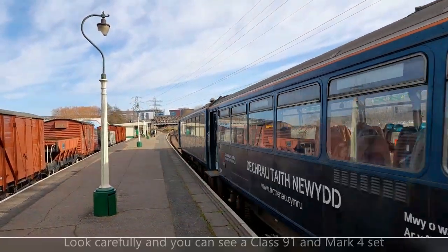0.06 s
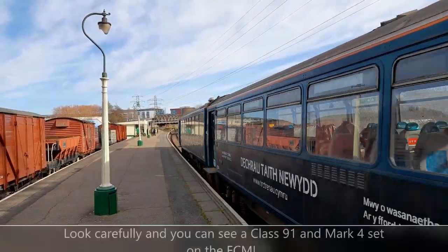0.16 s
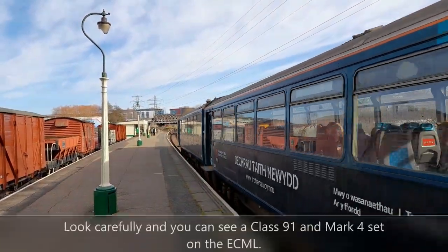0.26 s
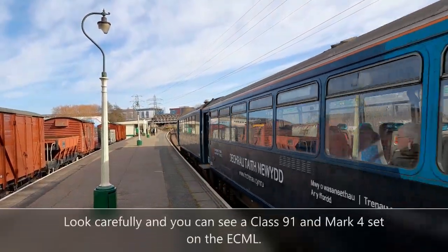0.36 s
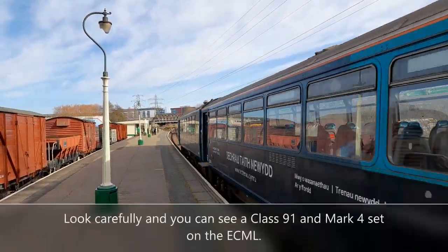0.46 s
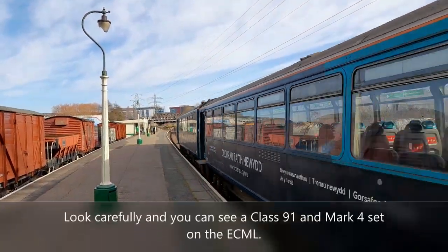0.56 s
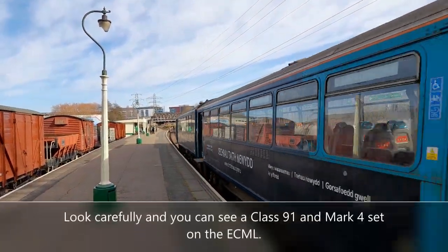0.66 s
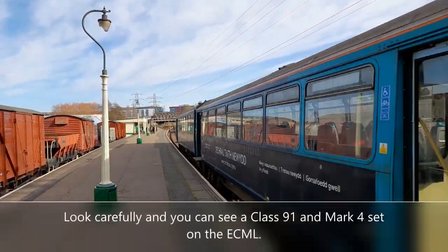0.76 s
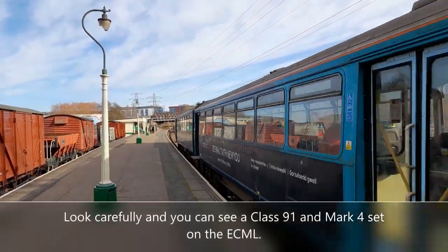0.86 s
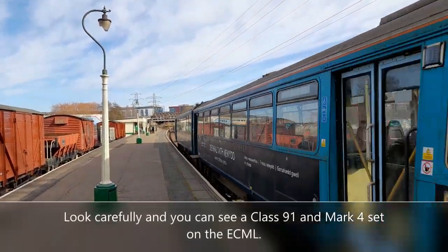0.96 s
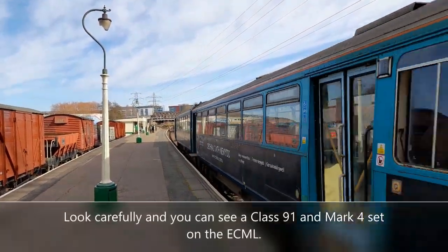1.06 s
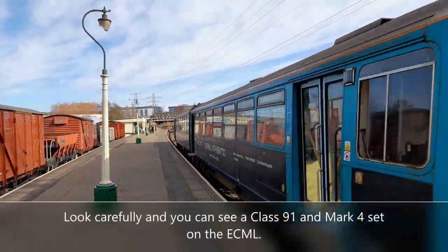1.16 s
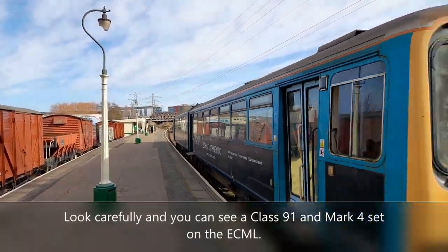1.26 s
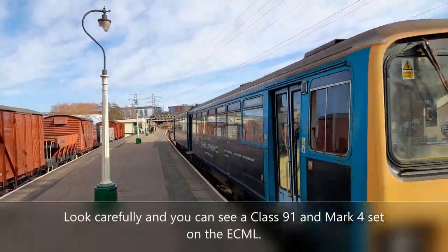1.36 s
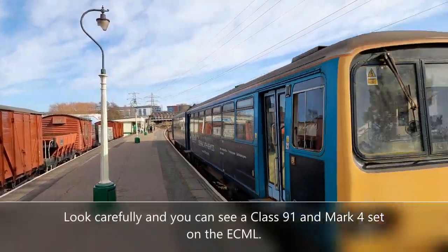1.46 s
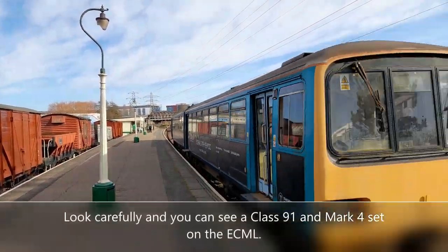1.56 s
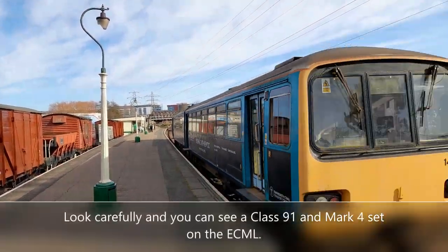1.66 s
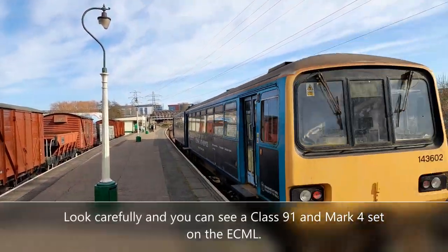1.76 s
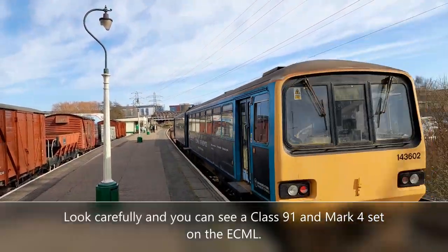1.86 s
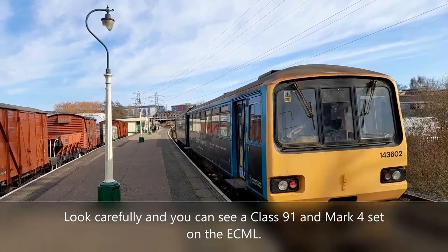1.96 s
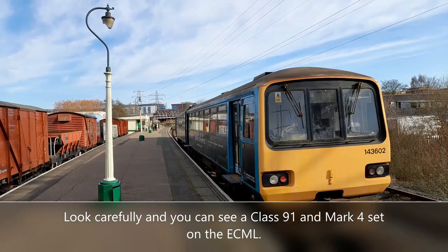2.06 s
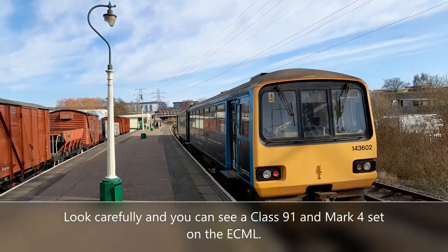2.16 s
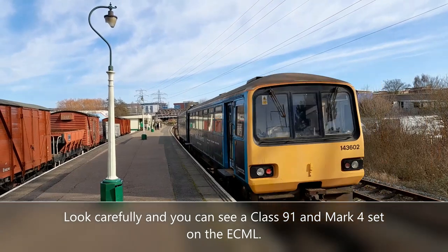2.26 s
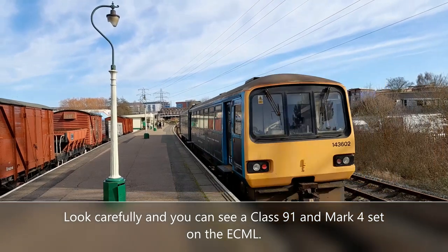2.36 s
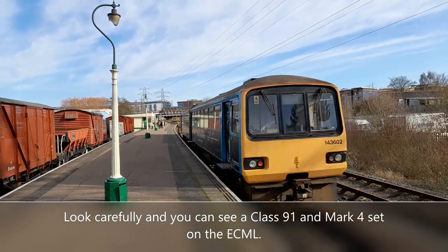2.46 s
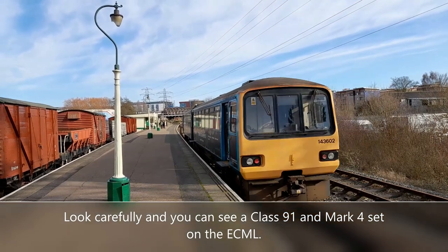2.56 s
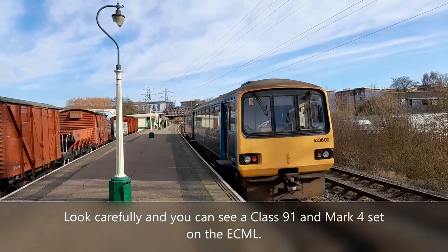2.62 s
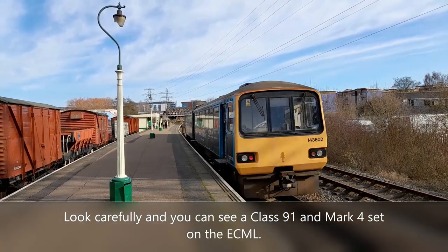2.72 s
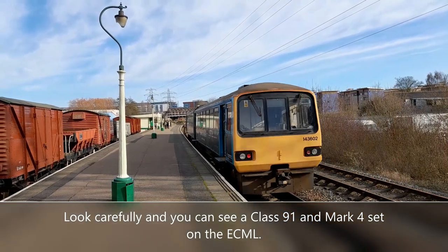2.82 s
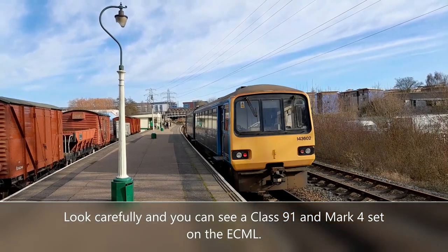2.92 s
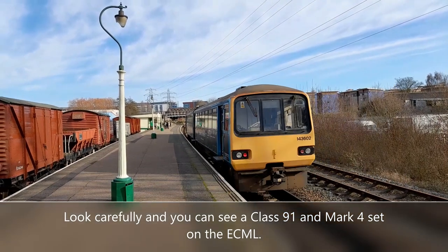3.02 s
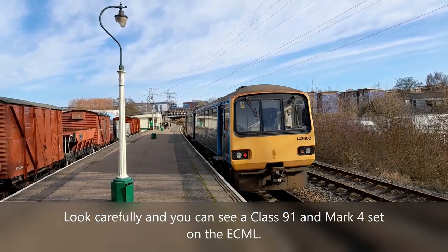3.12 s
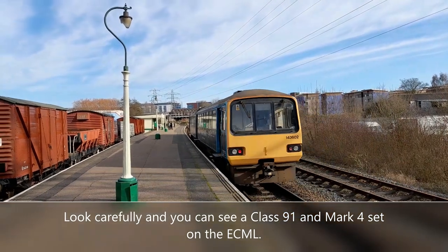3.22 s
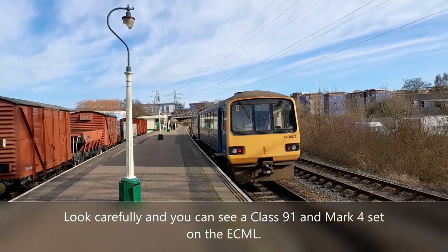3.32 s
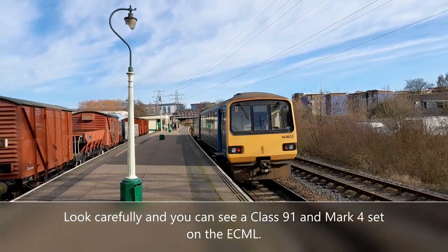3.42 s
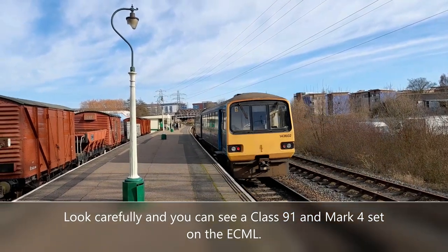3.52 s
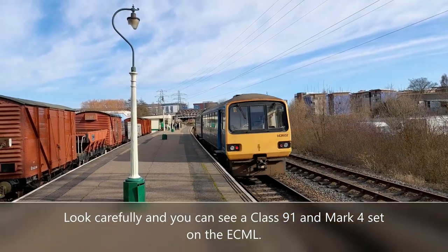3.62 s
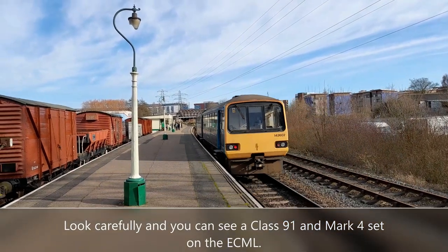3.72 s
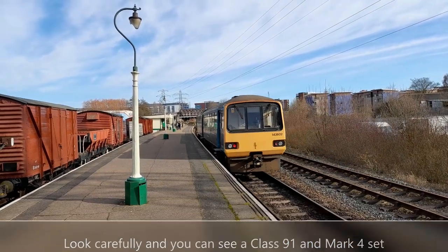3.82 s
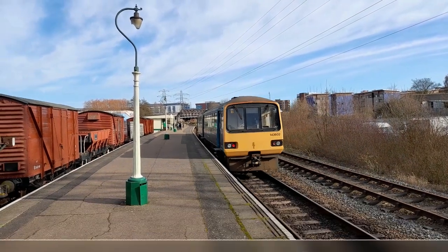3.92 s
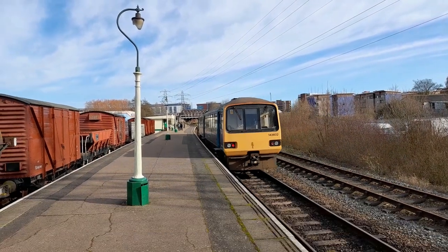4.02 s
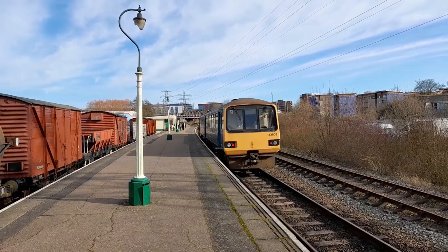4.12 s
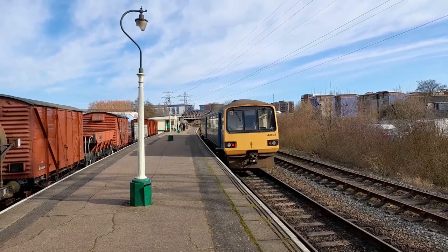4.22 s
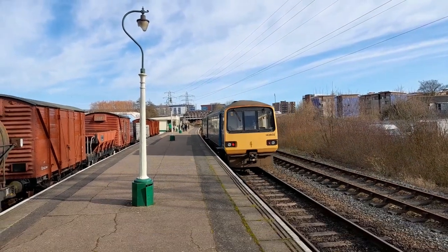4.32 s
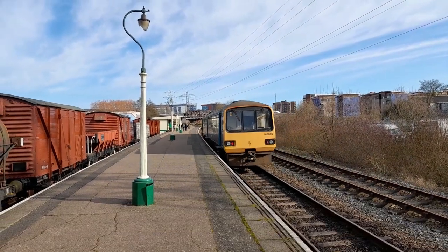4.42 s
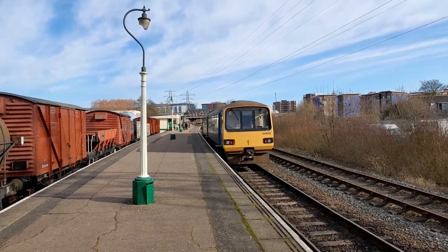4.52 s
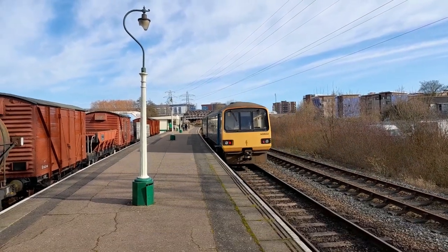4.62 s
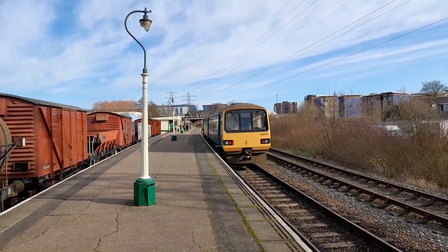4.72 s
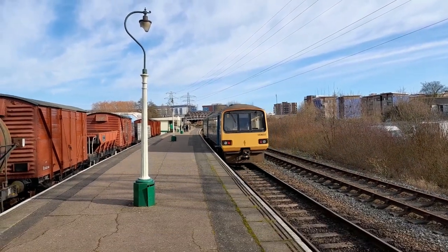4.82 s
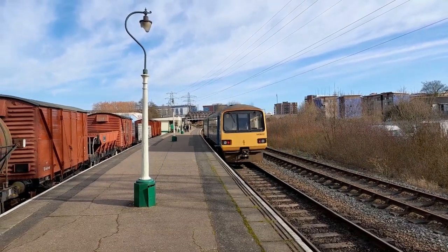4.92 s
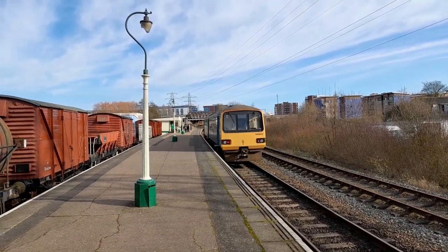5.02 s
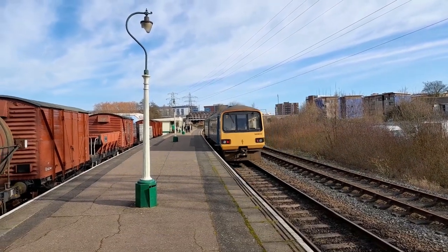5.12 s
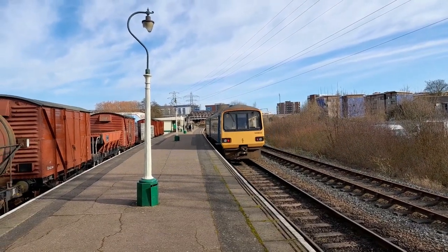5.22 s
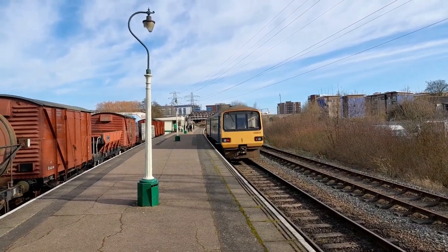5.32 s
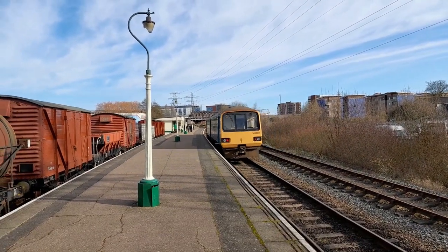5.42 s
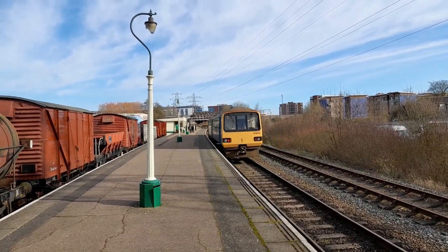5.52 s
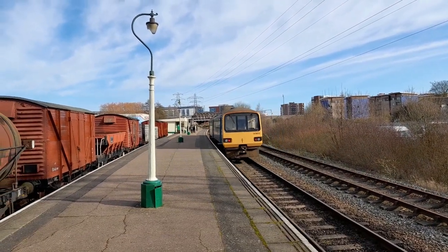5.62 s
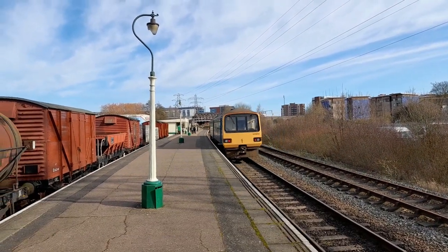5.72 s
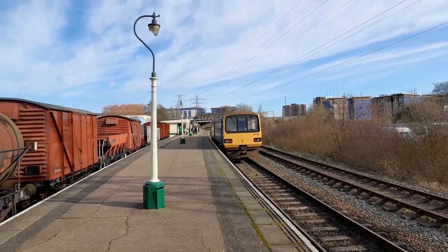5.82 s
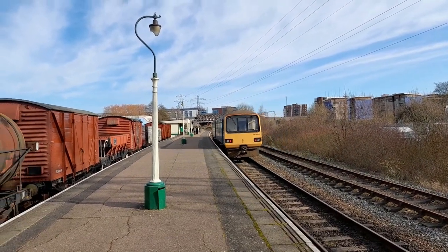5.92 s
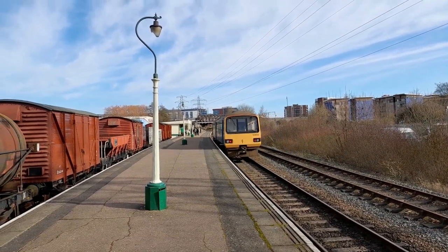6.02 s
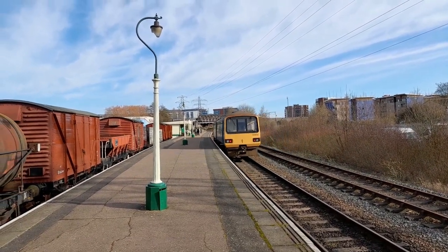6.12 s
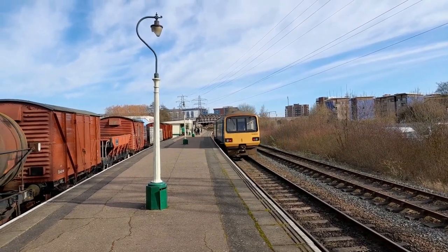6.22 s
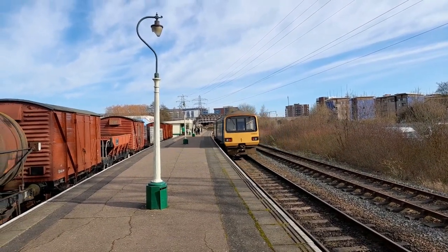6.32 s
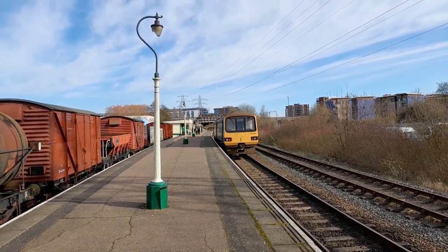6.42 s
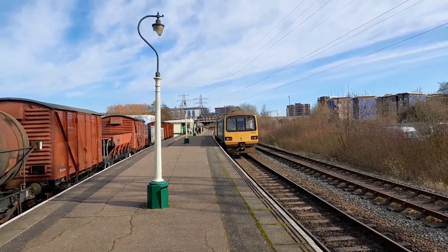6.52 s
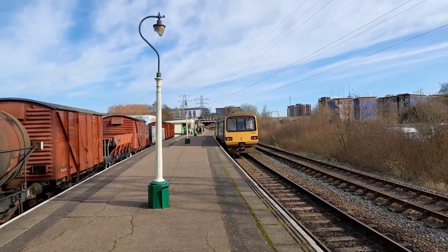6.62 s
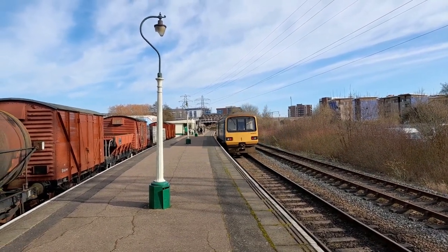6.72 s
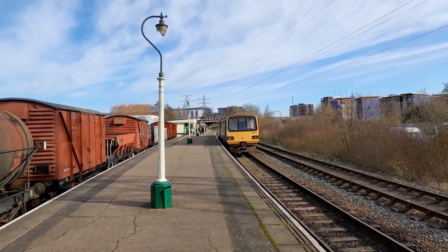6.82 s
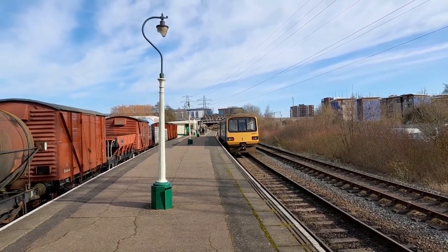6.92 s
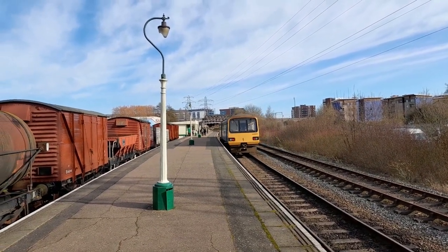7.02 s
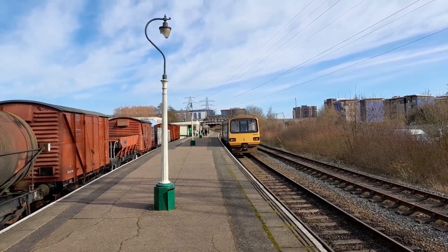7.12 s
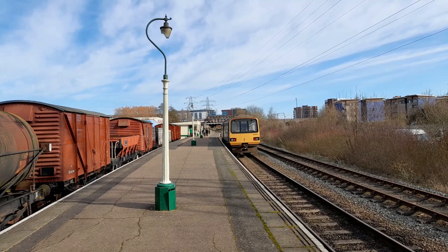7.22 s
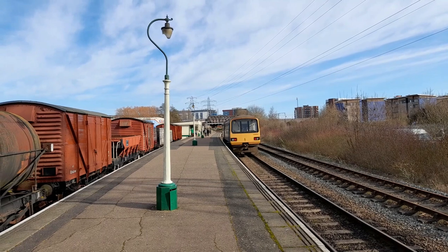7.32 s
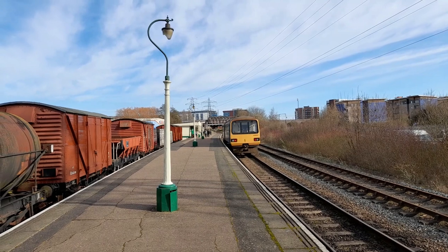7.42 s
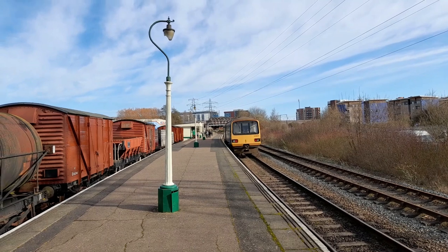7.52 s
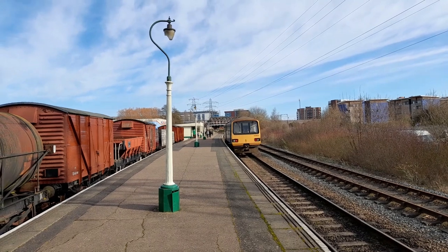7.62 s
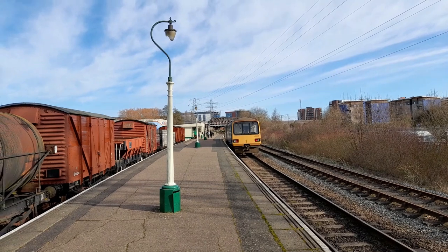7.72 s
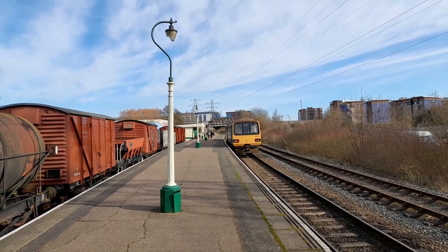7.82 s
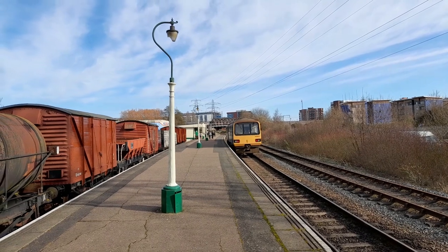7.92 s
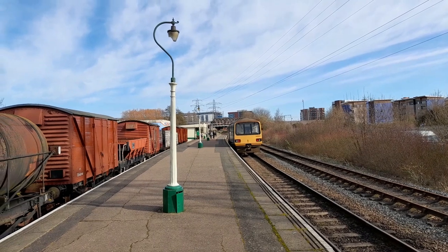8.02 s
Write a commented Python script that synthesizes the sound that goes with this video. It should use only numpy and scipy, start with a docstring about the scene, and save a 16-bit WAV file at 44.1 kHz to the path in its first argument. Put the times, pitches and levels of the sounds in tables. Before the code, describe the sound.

Close train wheels rumble, clank over rail joints and shriek on the curve, then recede into a low diesel drone with fainter late squeals.

```python
"""Diesel railbus leaving a curved platform

A diesel railbus draws slowly away along a curved station platform, close by at first.
Shaped noise rumbles for the rolling wheels; struck modes thud at the rail joints.
Noise-driven resonances grind as the flanges, and two gliding wheel modes take turns to squeal.
Engine orders drone underneath, bursts of contacts clatter, and a faint noise hisses on the left."""
import sys
import numpy as np
from scipy import signal
from scipy.io import wavfile

SR = 44100
rng = np.random.default_rng(int(sys.argv[2]) if len(sys.argv) > 2 else 0)


def generate_wav(sig):
    """Save sig (samples, or channels by samples) to the path in sys.argv[1] as 16-bit PCM at SR."""
    pcm = np.round(np.clip(np.atleast_2d(sig).T, -1, 1) * 32767).astype(np.int16)
    wavfile.write(sys.argv[1], SR, pcm)


N = 355887
TIME = np.arange(N) / SR


def from_db(db):
    """Decibels to gain."""
    return 10 ** (np.asarray(db) / 20)


def rms_one(x):
    """Scale to unit power."""
    return x / np.sqrt(np.mean(x ** 2) + 1e-20)


def at_hz(points, hz):
    """Read a spectrum on a log-frequency axis."""
    corner_hz, values = np.transpose(points)
    return np.interp(np.log(hz), np.log(corner_hz), values)


def pan(left_db):
    """Channel gains with a mean of one; left_db is left over right."""
    gains = from_db([[left_db / 2], [-left_db / 2]])
    return gains / gains.mean()


def drift(rate):
    """Smooth random wander of spread one; a higher rate in Hz wanders faster."""
    r = np.exp(-80 * np.pi * rate / SR)   # computed at every 40th sample
    noise = rng.standard_normal(N // 40 + 2002)
    slow = signal.lfilter([1], [1, -2 * r, r * r], noise)[2000:]   # skip the filter's start
    return np.interp(np.arange(N) / 40, np.arange(len(slow)), rms_one(slow))


def band(x, low, high):
    """Butterworth band-pass."""
    return signal.sosfilt(signal.butter(2, [low, min(high, .45 * SR)], "band", fs=SR, output="sos"), x)


def ring(clicks, hz, t60):
    """A unit click starts a decaying sine of starting height one."""
    r, w = from_db(-60 / (t60 * SR)), 2 * np.pi * hz / SR
    return signal.lfilter([0, np.sin(w)], [1, -2 * r * np.cos(w), r * r], clicks + 1e-18)


def rubbed(force, hz, width):
    """A resonance driven by friction, its far skirts reduced; unit power."""
    r = np.exp(-np.pi * width / SR)
    tone = signal.lfilter([1, 0, -1], [1, -2 * r * np.cos(2 * np.pi * hz / SR), r * r], force)
    return rms_one(band(tone, hz * .88, hz * 1.12))


def stereo(mid, side, alike):
    """Blend two independent noises into a pair whose left-right likeness is alike (-1 to 1)."""
    alike = np.clip(alike, -1, 1)
    return np.sqrt(1 + alike) * mid + np.sqrt(1 - alike) * side * [[1], [-1]]


# How alike the two ears hear the noise. Each row: frequency in Hz, left-right likeness from -1 to 1.
EAR_LIKENESS = [(40, 0.71), (300, 0.74), (650, 0.65), (1200, -0.28), (2200, 0.16), (4000, -0.25),
                (15000, -0.012)]


def banded_noise(spectrum, patchy_db, flicker_rate):
    """Third-octave stereo noise; the bands flicker partly together, partly alone; unit power."""
    out, together = 0, drift(flicker_rate)
    lowest, highest = spectrum[0][0], spectrum[-1][0]
    edges = np.geomspace(lowest, highest, 1 + round(3 * np.log2(highest / lowest)))
    white = rng.standard_normal((2, 2, N))   # neighbouring bands use different noise
    for k, (low, high) in enumerate(zip(edges, edges[1:])):
        mid, side = band(white[k % 2], low, high)
        hz = np.sqrt(low * high)
        flicker_db = patchy_db * (1.07 * together + drift(flicker_rate))
        gain = from_db(at_hz(spectrum, hz) + flicker_db)
        out = out + gain * stereo(mid, side, at_hz(EAR_LIKENESS, hz))
    return rms_one(out)


def platform(x, t60, alike):
    """Dense reflections between train and platform: decaying noise with a soft onset."""
    t = TIME[:SR]
    mid, side = rng.standard_normal((2, SR)) * from_db(-60 * t / t60) * (1 - np.exp(-t / 0.029))
    echoes = stereo(mid, side, alike) / np.sqrt(2 * np.sum(mid ** 2))
    return signal.fftconvolve(np.atleast_2d(x), echoes, axes=1)[:, :N]


def swell_db(s, rise, hold, fade, sag_db=0):
    """Rise, hold and fade; rise and fade are the times for 20 dB, and the hold may sag by some dB a second."""
    age = TIME - s
    outside = np.maximum(-age, 0) / rise + np.maximum(age - hold, 0) / fade
    return -20 * np.minimum(outside, 10) - sag_db * np.clip(age, 0, hold)


# the last wheels pass the listener and roll away at a steady speed
PASS_S, SPEED_M_PER_S, TRACK_DISTANCE_M = 0.024, 5.53, 2.17


def distance():
    """Metres from the listener to the last wheels."""
    return np.hypot(TRACK_DISTANCE_M, SPEED_M_PER_S * (TIME - PASS_S))


def spreading_db():
    """How much weaker a point source has become since it passed."""
    return 20 * np.log10(distance() / TRACK_DISTANCE_M)


# Rough stretches of rail add to the running noise, smooth ones take away.
# Each row: middle in seconds, half length in seconds, then boom, rumble, roar and rush change in dB.
ROUGH_STRETCHES = [(0.312, 0.2, 13.5, 6, 3, 2), (0.76, 0.19, 5, 3, 3.5, 2), (1.446, 0.6, -1.5, -1, 1.5, -1),
                   (2.665, 0.45, 2.5, 7, 4.5, 4), (3.318, 0.36, 4, 2, 6, 1),
                   (3.984, 0.11, -17, -1, -3, -1.5), (4.202, 0.19, 4.5, 2, 8.5, -0.5),
                   (4.85, 0.21, 4.5, 3, 6, -0.5), (5.3, 0.22, -0.5, -1, -1.5, -1),
                   (5.648, 0.087, 1, 1, 7, 1.5), (6.301, 0.19, 5, 0, 2, 0), (7.607, 0.11, -8, 0, 0, -1)]


def rail_roughness_db():
    """What the state of the rail adds to boom, rumble, roar and rush."""
    bumps = [np.exp(-np.minimum(((TIME - s) / half) ** 2, 20)) for s, half, *_ in ROUGH_STRETCHES]
    return np.array(ROUGH_STRETCHES)[:, 2:].T @ np.array(bumps)


# base level at the passing in dB, share of the spreading loss suffered
BOOM_DB, BOOM_FALL = -44, 0.031
RUMBLE_DB, RUMBLE_FALL = -31, 0.57
ROAR_DB, ROAR_FALL = -35, 0.7   # each layer that uses it trims it further
RUSH_DB, RUSH_FALL = -32, 0.88


def running_levels():
    """Boom, rumble, roar and rush in dB: they fall with distance and follow the roughness of the rail."""
    base_db = np.array([[BOOM_DB], [RUMBLE_DB], [ROAR_DB], [RUSH_DB]])
    fall = np.array([[BOOM_FALL], [RUMBLE_FALL], [ROAR_FALL], [RUSH_FALL]])
    return base_db - fall * spreading_db() + rail_roughness_db()


# Colours of the running noise, lowest to highest. Each row: frequency in Hz, relative density in dB per Hz.
BOOM_SPECTRUM = [(22, -27.5), (33, -13), (45, 1.5), (62, 6), (85, -0.5), (110, -0.5)]
RUMBLE_SPECTRUM = [(60, -37), (85, -1.5), (125, 2.5), (190, -1.5), (290, -1.5), (400, -14), (560, -5)]
ROAR_SPECTRUM = [(330, -24.5), (410, -20.5), (510, -9), (660, 12), (800, -9.5), (1050, -13.5), (1400, -44)]
RUSH_SPECTRUM = [(650, -34), (950, 8), (1400, -0.5), (1780, 2.5), (2050, 2), (2700, 0), (3400, -3),
                 (4400, -12.5), (6500, -63), (10000, -69.5), (15000, -46)]


def rolling():
    """Rough wheels on rough rail shake the body and the wheels: four layers of flickering noise."""
    boom_db, rumble_db, roar_db, rush_db = running_levels()
    jolts = from_db(1.84 * drift(18.3))   # bumps in the rail shake all the low modes together
    boom = from_db(boom_db) * banded_noise(BOOM_SPECTRUM, patchy_db=3.5, flicker_rate=40)
    rumble = from_db(rumble_db) * banded_noise(RUMBLE_SPECTRUM, patchy_db=1.34, flicker_rate=18)
    roar = from_db(roar_db - 2.5) * banded_noise(ROAR_SPECTRUM, patchy_db=2.4, flicker_rate=22)
    rush = from_db(rush_db) * banded_noise(RUSH_SPECTRUM, patchy_db=1.2, flicker_rate=30)
    return jolts * (boom + rumble * pan(-0.286)) + roar * pan(-0.85) + rush


# Wheel and rail resonances stirred by rolling. Each row: frequency in Hz, width in Hz, relative level in dB.
ROLLING_MODES = [(531.7, 32, 0), (606.8, 18, 1.5), (692, 37, 0), (843, 8.1, -11.5), (1176, 20, -8),
                 (1574, 31, -9.5), (1731, 81, -4.5)]


def rail():
    """Rolling keeps the wheel and rail resonances humming."""
    _, _, roar_db, _ = running_levels()
    force = rng.standard_normal(N) + 0.41 * rng.standard_normal((2, N))   # shared, and own to each ear
    hum = sum(from_db(db) * rubbed(force, hz, width) for hz, width, db in ROLLING_MODES)
    return from_db(roar_db - 4.0) * rms_one(hum)


# a slipping wheel chatters in short catches
CATCHES_PER_S, CATCH_RISE_S, CATCH_RING_S, CATCH_SLIDE_HZ_PER_S = 280, .03, .008, 2500


def rasp(half_width_hz):
    """Chatter: the wheel catches again and again at scattered, sliding pitches; complex, unit power."""
    age = TIME[:int(8 * CATCH_RING_S * SR)]
    envelope = (1 - np.exp(-age / CATCH_RISE_S)) * np.exp(-age / CATCH_RING_S)
    out = np.zeros((2, N + 2 * len(age)), complex)
    catches = rng.uniform(-1, 1, (int(N / SR * CATCHES_PER_S), 5))
    for k, (late, offset, slide, left, right) in enumerate(catches):
        at = int((k + (1 + late) / 2) / CATCHES_PER_S * SR)
        offset_hz = half_width_hz * np.arctanh(.95 * offset)   # mostly near the middle, a few far off
        turns = offset_hz * age + CATCH_SLIDE_HZ_PER_S * slide * age ** 2 / 2
        ears = np.exp(1j * np.pi * np.array([[left], [right]]))
        out[:, at:at + len(age)] += envelope * np.exp(2j * np.pi * turns) * ears
    return out[:, :N] / np.sqrt(np.mean(np.abs(out) ** 2))


def grip(rows):
    """Pitch, level and roughness of one wheel mode, weighted towards the strongest squeal of the moment."""
    power, pitches = [], []
    for s, rise, hold, fade, hz, glide, db, _ in rows:
        power.append(from_db(db + swell_db(s, rise, hold, fade)) ** 2)
        pitches.append(hz + glide * np.clip(TIME - s, -rise, hold + fade))
    power, pitches = np.array(power), np.array(pitches)
    total = power.sum(axis=0)
    rough = np.clip(np.array(rows)[:, -1] @ power / total, 0, 1)
    return (pitches * power).sum(axis=0) / total, 10 * np.log10(total), rough


# a held squeal loses its grip for a moment, several times a second
THROB_PERIOD_S, THROB_AT_S = .126, 2.035
# the rasp's half width before each mode's spread, and its place above a clean tone
RASP_HALF_WIDTH_HZ, RASP_ABOVE_HZ = 54, 40
# The clean tone's phase between the ears shifts as the wheel moves.
# Each row: time in seconds, left phase lead in radians.
EAR_PHASE_LEAD = [(.6, -.5), (1, .8), (1.7, 0), (6.1, 0), (6.8, -1.6)]


def squeal(rows, jitter_hz, flutter_db, throb_db, octave_db, spread):
    """Stick-slip locks onto one wheel mode as a focused tone; as it loses its grip, chatter takes over."""
    hz, level_db, rough = grip(rows)
    clean = np.sqrt(1 - rough ** 2)
    phase = 2 * np.pi * np.cumsum(hz + jitter_hz * rough * drift(30)) / SR
    shift = np.exp(2j * np.pi * np.cumsum(RASP_ABOVE_HZ * clean) / SR)
    slipping = rasp(RASP_HALF_WIDTH_HZ * spread) * shift
    ears = np.exp(1j * np.interp(TIME, *np.transpose(EAR_PHASE_LEAD)) * np.array([[1], [0]]))
    throb = from_db(-throb_db * np.cos(np.pi * (TIME - THROB_AT_S) / THROB_PERIOD_S) ** 12)
    flutter = from_db(flutter_db * drift(90))
    swing = (clean * throb * ears + rough * slipping) * flutter * np.exp(1j * phase)
    octave = from_db(octave_db) * rough * swing ** 2   # squaring doubles the pitch
    return from_db(level_db) * np.sqrt(2) * (swing + octave).real


MODE_SPLIT_HZ = 5250
# reflections of the squeal: level as the train passes, and growth per dB of spreading loss
SQUEAL_ECHO_DB, SQUEAL_ECHO_GROWTH = -12.5, 0.15
# A wheel mode takes hold and squeals. Each row: full level at in seconds, rise, hold and fade in seconds,
# pitch in Hz, glide in Hz per second, level in dB, roughness (0 clean, 1 all chatter).
SQUEAL_EVENTS = [(0.284, .3, 0.18, 0.17, 5160, 0, -47.5, 0.9),
                 (0.529, 0.046, 0.2, 0.33, 5396, 153, -29, 0.83),
                 (.58, .033, .022, .04, 5400, 0, -19.3, .3), (0.601, 0.13, 0.5, 0.197, 4950, -1, -42.5, 1),
                 (0.918, 0.16, 0.19, 0.057, 5055, -150, -28, 0.99),
                 (0.848, 0.23, 0.14, 0.3, 5430, 5, -39.5, 0.88),
                 (.968, .085, .047, .016, 5110, 0, -19.3, .27),
                 (1.062, .008, .035, .035, 5110, 0, -20.5, .3),
                 (1.155, .03, .015, .03, 4990, -2500, -39, .5),
                 (1.202, 0.19, 0.21, 0.12, 5090, -150, -40.5, 0.96),
                 (1.27, .025, .012, .03, 5170, 1500, -40.5, .4),
                 (1.378, .02, .015, .04, 5105, -900, -39, .4),
                 (1.428, .03, .018, .035, 5020, -2400, -41.5, .45),
                 (1.291, 0.38, 0.33, 0.18, 5475, 76, -46, .8),
                 (1.532, .015, .012, .025, 5470, 0, -37.5, .3),
                 (1.729, 0.07, .29, 0.025, 5405, 0, -33.3, .58),
                 (1.79, 0.28, 0.38, 0.44, 4955, -1, -57, 1.01),
                 (2.066, 0.04, 0.462, 0.03, 5404, 0, -32.8, .55),
                 (2.576, 0.056, 0.054, .22, 5408, 3, -40, 0.65),
                 (6.058, 0.06, 0.11, 0.04, 5400, -1, -35.5, 0.63),
                 (6.236, 0.18, 0.3, 0.18, 5453, -3.5, -42.5, 0.73),
                 (6.17, 0.14, 0.495, 0.23, 5254, -280, -49, 0.94),
                 (6.34, 0.13, 0.09, 0.17, 5090, -1.5, -48.5, 1.03),
                 (6.633, 0.33, 0.27, .26, 5094, -100, -44, .98),
                 (6.834, 0.05, 0.02, 0.038, 5070, 4.5, -42.5, 0.3),
                 (7.022, 0.16, 0.065, 0.14, 5060, 601.5, -59, 1.01),
                 (7.12, .35, 0.21, 0.33, 5474, 4.5, -46.5, .8),
                 (7.467, 0.2, 0.29, 0.089, 5420, 68, -45, 0.85),
                 (7.622, .008, .03, .04, 5480, 0, -41.5, .4),
                 (7.664, 0.073, 0.096, 0.13, 4980, 4.5, -54, 0.7),
                 (7.824, 0.055, 0.017, 0.13, 4970, -100, -47, 0.51),
                 (7.862, 0.11, 0.14, .2, 5415, -4.5, -43, .5)]


def squeals():
    """Close by the squeal comes straight from the wheel; from afar more of it is reflected."""
    upper = [row for row in SQUEAL_EVENTS if row[4] > MODE_SPLIT_HZ]
    lower = [row for row in SQUEAL_EVENTS if row[4] <= MODE_SPLIT_HZ]
    direct = squeal(upper, jitter_hz=9, flutter_db=1.9, throb_db=9, octave_db=-24, spread=1)
    # the lower mode slips harder and so carries more of its octave
    direct = direct + squeal(lower, jitter_hz=16, flutter_db=1.5, throb_db=2, octave_db=-14.5, spread=1.6)
    echo_gain = from_db(SQUEAL_ECHO_DB + SQUEAL_ECHO_GROWTH * spreading_db())
    return pan(5.1) * (direct + platform(echo_gain * direct, t60=.1, alike=-.4))


GRIND_SAG_DB_PER_S, SING_SAG_DB_PER_S = 9, 10.5
# The flange presses on the rail. Each row: full level at in seconds, rise, hold and fade in seconds,
# scrape level in dB, bright sizzle level in dB.
FLANGE_CONTACTS = [(0.6, 0.096, 0.13, 0.35, -28, -32), (0.967, 0.36, 0.1, 0.12, -35, -45.5),
                   (1.193, .1, 0.18, 0.76, -47.5, -70), (1.796, .13, 0.45, 0.46, -43, -51.5),
                   (6.14, 0.18, 0.54, 1, -43.5, -54.5), (7.622, 0.53, 0.54, 0.45, -55, -69)]
# The top modes sing on. Each row: full level at in seconds, rise, hold and fade in seconds, level in dB.
SINGING_SPELLS = [(.72, .16, 1.15, 0.2, -39), (6.25, .3, .2, 1.26, -65), (7.05, 0.41, 0.73, 0.62, -71)]


def flange_levels():
    """Gains of scrape, sizzle and singing: each contact bites, eases and lets go."""
    contacts = from_db([swell_db(*row[:4], GRIND_SAG_DB_PER_S) for row in FLANGE_CONTACTS])
    *_, scrape_db, sizzle_db = np.transpose(FLANGE_CONTACTS)
    scrape = np.max(from_db(scrape_db)[:, None] * contacts, axis=0)
    sizzle = np.max(from_db(sizzle_db)[:, None] * contacts, axis=0)
    spells = [from_db(row[4] + swell_db(*row[:4], SING_SAG_DB_PER_S)) for row in SINGING_SPELLS]
    return scrape, sizzle, np.max(spells, axis=0)


# Wheel modes under the scraping flange: low ones, bright clustered ones, and lightly damped top ones.
# Each row: frequency in Hz, width in Hz, relative level in dB.
LOW_WHEEL_MODES = [(1704, 150, -6.5), (2135, 210, -4), (2446, 290, -7.5), (2696, 140, -4),
                   (3215, 230, -2.5), (4100, 460, -10)]
BRIGHT_WHEEL_MODES = [(5080, 300, 0), (5880, 130, 0), (6620, 110, -6), (6890, 130, -1.5), (7550, 140, -9),
                      (7950, 120, -6), (8140, 110, -1), (9170, 110, -6.5), (9430, 200, -4.5),
                      (10330, 420, 4.5), (10830, 170, 3.5), (11200, 200, -5), (11630, 200, -1),
                      (12420, 160, -5), (12760, 110, -4), (12990, 130, -4), (13560, 110, -2.5),
                      (13760, 110, -4), (14150, 400, -5)]
SINGING_WHEEL_MODES = [(8440, 16, -11), (9398, 10, -11), (10444, 10, -12), (11577, 5, 1), (11645, 8, -6),
                       (12550, 8, -18), (12776, 7, -16)]


def flange():
    """The scraping flange drives all the wheel's resonances; the top ones sing on."""
    scrape, sizzle, sing = flange_levels()
    friction = rng.standard_normal((2, 2, N)) * from_db(1.5 * drift(90))
    low = high = singing = 0
    for k, (hz, width, db) in enumerate(LOW_WHEEL_MODES):
        low = low + from_db(db + 3 * drift(26)) * rubbed(friction[k % 2], hz, width)
    for k, (hz, width, db) in enumerate(BRIGHT_WHEEL_MODES):
        mode = rms_one(band(friction[k % 2], hz - width / 2, hz + width / 2))
        high = high + from_db(db + 2 * drift(27)) * mode
    for hz, width, db in SINGING_WHEEL_MODES:
        singing = singing + from_db(db) * rubbed(friction[0], hz, width)
    low, high, singing = rms_one(low), rms_one(high), rms_one(singing)
    return scrape * low * pan(1.0) + sizzle * high * pan(12.0) + sing * singing * pan(5.9)


# a brief catch rings purely, a long one rasps; both waver in pitch
CHIRP_RASPS_AFTER_S, CHIRP_CHATTER_HZ, CHIRP_WANDER_HZ = .16, 80, 22
# Other wheel modes sing briefly. Each row: start in seconds, length in seconds, pitch in Hz, level in dB.
CHIRP_EVENTS = [(0.538, 0.12, 2670, -36), (0.558, .13, 3580, -36), (0.57, .055, 3970, -34),
                (0.608, 0.078, 3290, -41), (0.62, 0.12, 3980, -36), (.68, 0.11, 2104, -39),
                (.68, 0.14, 3160, -39), (.71, 0.11, 2700, -37), (0.738, 0.098, 2240, -41),
                (0.888, .06, 2720, -41), (0.904, 0.033, 2520, -36), (1.021, 0.059, 2450, -38),
                (1.022, 0.027, 2320, -37), (1.746, 0.29, 3985, -47), (1.763, 0.11, 2690, -44.5),
                (2.137, 0.4, 2710, -49), (2.02, 0.51, 4010, -54), (2.225, 0.05, 2670, -41),
                (2.321, 0.071, 2704, -38), (2.329, 0.066, 3970, -45), (6.037, 0.53, 2706, -47.5),
                (6.157, 0.33, 3130, -50), (6.53, 0.3, 2650, -46), (7.346, 0.79, 2703, -55.5)]


def chirps():
    """The flange now and then catches another wheel mode, which swells, wavers and fades."""
    out, wander, chatter = np.zeros((2, N)), drift(12), rasp(CHIRP_CHATTER_HZ)
    for s, length, hz, db in CHIRP_EVENTS:
        now = np.flatnonzero((TIME > s) & (TIME < s + length))
        own = (now + rng.integers(N)) % N   # each mode wavers in its own way
        swell = np.sqrt(np.abs(np.sin(np.pi * (TIME[now] - s) / length)))
        rough = min(length / CHIRP_RASPS_AFTER_S, 1)
        ears = np.exp(1j * rng.normal(0, 1.0, (2, 1)))
        tone = np.sqrt(1 - rough) * ears + np.sqrt(rough) * chatter[:, own]
        turns = np.cumsum(hz + CHIRP_WANDER_HZ * wander[own]) / SR
        out[:, now] += from_db(db) * np.sqrt(2) * swell * (tone * np.exp(2j * np.pi * turns)).real
    return out * pan(1.27)


# a light touch comes just before the drop, one heavier rebound after it; levels relative to the drop
TOUCH_S, TOUCH_DB, TOUCH_THUMP_DB = .0055, -13, -12
REBOUND_S, REBOUND_DB, REBOUND_THUMP_DB = .0108, -9, 4
# bending waves bring each mode after the same number of its cycles
ARRIVAL_CYCLES, CONTACT_CUT_HZ = 1.3, 1450
# Wheels drop at rail joints. Each row: time in seconds, level in dB, low thump in dB relative, room in dB relative.
JOINT_DROPS = [(.27, -10.5, -7, -7), (2.142, -10.5, -2, -14), (2.833, -29.5, 3, 0), (3.14, -40, -16, -9),
               (4.835, -27, -6, -1), (5.57, -43, -4, 2), (7.71, -37, 0, 0)]
# Wheel, rail and sleeper modes. Each row: frequency in Hz, relative level in dB, 60 dB decay in seconds.
TRACK_MODES = [(62, -9, .12), (125, -9, .1), (188, -10, .11), (307, -8.5, .08), (520, -12, .035),
               (680, -11, .03), (830, -6.5, .042), (915, -5.5, .042), (1030, -15, .03), (1250, -15, .022)]


def joints():
    """Each wheel touches the rail end, drops and rebounds; the lower a mode, the later it arrives."""
    out, sent = np.zeros(N), np.zeros(N)
    touches = np.array(JOINT_DROPS) + [-TOUCH_S, TOUCH_DB, TOUCH_THUMP_DB, 0]
    rebounds = np.array(JOINT_DROPS) + [REBOUND_S, REBOUND_DB, REBOUND_THUMP_DB, 0]
    s, level_db, thump_db, room_db = np.vstack([JOINT_DROPS, touches, rebounds]).T
    chance_db = rng.normal(0, .8, (len(s), len(TRACK_MODES)))
    for k, (hz, db, t60) in enumerate(TRACK_MODES):
        heavy = hz < 400   # only low modes carry the thump
        at = ((s + ARRIVAL_CYCLES / hz) * SR).astype(int)
        clicks = np.zeros((2, N))
        clicks[0, at] = from_db(level_db + db + heavy * thump_db + chance_db[:, k]) * (-1) ** k
        clicks[1, at] = clicks[0, at] * from_db(room_db)
        struck, to_room = ring(clicks, hz, t60)
        out, sent = out + struck, sent + to_room
    softened = signal.butter(4, CONTACT_CUT_HZ, fs=SR, output="sos")
    return signal.sosfilt(softened, out + platform(sent, t60=0.15, alike=0.5))


CRUNCH_DB, CRUNCH_S = -13.5, .05   # level against the drop, before the room's share; burst length scale
CRUNCH_LOW_HZ, CRUNCH_HIGH_HZ = 640, 1000


def crunch():
    """After each drop the tread grinds over the rail end in a dense burst, which reflections strengthen."""
    envelope = 0
    for s, db, _, room_db in JOINT_DROPS:
        burst_db = swell_db(s + CRUNCH_S / 5, CRUNCH_S / 5, CRUNCH_S / 2, CRUNCH_S)
        envelope = envelope + from_db(db + room_db / 2 + burst_db)
    contacts = rng.standard_normal(N) + .5 * rng.standard_normal((2, N))
    for _ in range(2):   # twice for steeper edges
        contacts = band(contacts, CRUNCH_LOW_HZ, CRUNCH_HIGH_HZ)
    return from_db(CRUNCH_DB) * envelope * rms_one(contacts)


FIRING_HZ = 62.15   # average; it wanders slightly
# two engines turn at nearly the same speed and beat; the drone grows as they pull
DRONE_DB, DRONE_GROWTH_DB_PER_S, BEAT_DB, BEAT_PERIOD_S = -53, 1.25, 2.5, 1.664
# Engine orders. Each row: multiple of the firing rate, relative level in dB.
ENGINE_ORDERS = [(0.829, -6.5), (1, -6.5), (1.169, -9.5), (2, -9), (2.501, -9.5), (3.002, -11)]


def engine():
    """The exhaust drones at the firing rate, swelling with each beat; uneven cylinders add orders around it."""
    beat_db = BEAT_DB * np.cos(2 * np.pi * TIME / BEAT_PERIOD_S)
    drone_db = DRONE_DB + DRONE_GROWTH_DB_PER_S * TIME + beat_db
    turns = np.cumsum(FIRING_HZ * (1 + 0.01975 * drift(3.99))) / SR
    drone = 0
    for multiple, db in ENGINE_ORDERS:
        tone = np.sin(2 * np.pi * (multiple * turns + rng.random()))
        drone = drone + from_db(db + 5.2 * drift(4.3)) * tone
    return from_db(drone_db) * rms_one(drone)


# Loose running gear. Each row: start in seconds, level in dB, rise in seconds, 60 dB decay in seconds,
# frequency in Hz (main mode, and roughly the top of the contact noise).
CLATTER_BURSTS = [(0.239, -34, .004, 0.037, 2480), (4.237, -49, 0.0018, 0.063, 4540),
                  (4.245, -42.5, 0.006, 0.45, 2906), (4.25, -49, 0.035, 0.31, 1864),
                  (4.874, -40.5, 0.019, 0.7, 2900), (4.874, -53, .006, .3, 5000),
                  (4.874, -57, 0.006, 0.25, 12500), (5.329, -57, .002, 0.022, 13500),
                  (5.62, -49.5, 0.056, 0.31, 2420)]


def clatter():
    """Loose metal chatters in bursts of dense contacts; a sharp first blow also sets the part ringing."""
    out = np.zeros((2, N))
    for s, db, rise, t60, hz in CLATTER_BURSTS:
        age = np.maximum(TIME - s, 0)
        decay_db = 60 * np.clip(age - rise, 0, 2 * t60) / t60
        envelope = np.minimum(age / rise, 1) * from_db(db - decay_db)
        noise = rng.standard_normal((2, N)) * from_db(1.1 * drift(90))
        contacts = rms_one(band(noise, hz / 2.25, hz * 0.98))
        modes = 0
        for ratio in (.8, 1, 1.08):
            modes = modes + np.sin(2 * np.pi * (hz * ratio * age + rng.random((2, 1))))
        sharpness = np.exp(-rise / .015)   # a fast rise rings more
        out += envelope * (contacts + sharpness * rms_one(modes)) / np.hypot(1, sharpness)
    return out


# Light knocks in the running gear. Each row: time in seconds, level in dB, middle mode in Hz.
KNOCK_TAPS = [(3.239, -27, 660), (3.263, -25, 680), (3.864, -32, 720), (5.328, -31, 680), (6.649, -33, 900)]


def knocks():
    """A loose part taps, and each tap rings briefly in three modes."""
    out = np.zeros(N)
    for s, db, hz in KNOCK_TAPS:
        click = from_db(db) * (np.arange(N) == int(s * SR))
        out += sum(ring(click, hz * ratio, t60=.022) for ratio in (.65, 1, 1.5)) / 2
    return out


# A steel part under the body clanks. Each row: time in seconds, level in dB.
CLANK_BLOWS = [(4.246, -42.5), (4.258, -47), (4.303, -50)]
# Its modes. Each row: frequency in Hz, relative level in dB, 60 dB decay in seconds.
CLANK_MODES = [(1737, -5, .25), (1906, -4, .2), (2051, -9, .25), (2680, -4, .14), (2778, -7, .22),
               (2939, 0, .3), (3128, -7, .25), (4330, -15, .06), (4850, -9, .04)]


def clank():
    """Two steel faces meet a few times in quick succession and leave a short, high ring."""
    clicks = np.zeros(N)
    for s, db in CLANK_BLOWS:
        clicks[int(s * SR)] = from_db(db)
    struck = sum(from_db(db) * ring(clicks, hz, t60) for hz, db, t60 in CLANK_MODES)
    return struck + .5 * platform(struck, t60=.15, alike=0)


RATTLE_CONTACTS_PER_S = 400
# A loose fitting rattles. Each row: full level at in seconds, rise, hold and fade in seconds, level in dB.
RATTLE_SPELLS = [(4.89, .025, .05, .11, -44.5), (5.65, .04, .05, .12, -53)]
# Its modes. Each row: frequency in Hz, width in Hz, relative level in dB.
FITTING_MODES = [(1720, 50, -3), (2300, 60, 0), (2780, 35, -6), (3410, 120, -8)]


def rattle():
    """Jolted by a rail joint, a loose steel fitting shakes and rings under random contacts."""
    envelope = sum(from_db(row[4] + swell_db(*row[:4])) for row in RATTLE_SPELLS)
    contacts = rng.standard_normal((2, N)) * (rng.random(N) < RATTLE_CONTACTS_PER_S / SR)
    ringing = sum(from_db(db) * rubbed(contacts, hz, width) for hz, width, db in FITTING_MODES)
    return envelope * rms_one(ringing)


HISS_DB = -64.5
# fizz level at zero distance on even rail, its loss, and how strongly it follows the rush's roughness
FIZZ_DB, FIZZ_LOSS_DB_PER_M, FIZZ_FOLLOWS = -54.5, 0.8, 1.45
# Colours of hiss and fizz. Each row: frequency in Hz, relative density in dB per Hz.
HISS_SPECTRUM = [(2500, -42), (4500, 0), (7000, -2), (11000, -7), (14500, -13.5)]
FIZZ_SPECTRUM = [(5500, 2), (8000, -5), (10500, 8), (14500, -1)]


def hiss():
    """A thin, nearly steady hiss and the fizz of the rail close by, both mostly on the left."""
    *_, rough_db = rail_roughness_db()
    fizz_db = FIZZ_DB - FIZZ_LOSS_DB_PER_M * distance() + FIZZ_FOLLOWS * rough_db
    steady = from_db(HISS_DB) * banded_noise(HISS_SPECTRUM, patchy_db=.5, flicker_rate=12)
    fizz = from_db(fizz_db) * banded_noise(FIZZ_SPECTRUM, patchy_db=.7, flicker_rate=12)
    return steady * pan(26) + fizz * pan(12)


def scene():
    """The train as heard from the platform."""
    wheels = rolling() + rail() + squeals() + flange() + chirps() + joints() + crunch()
    loose_parts = clatter() + knocks() + clank() + rattle()
    return wheels + engine() + loose_parts + hiss()


def record(dry):
    """The top is cut steeply above 15.6 kHz."""
    return signal.sosfilt(signal.ellip(10, .1, 80, 15600, fs=SR, output="sos"), dry)


dry = scene()
out = record(dry)
generate_wav(out)
```